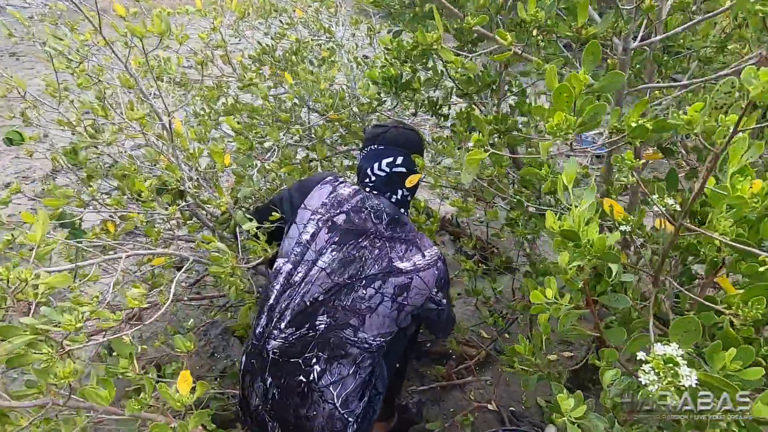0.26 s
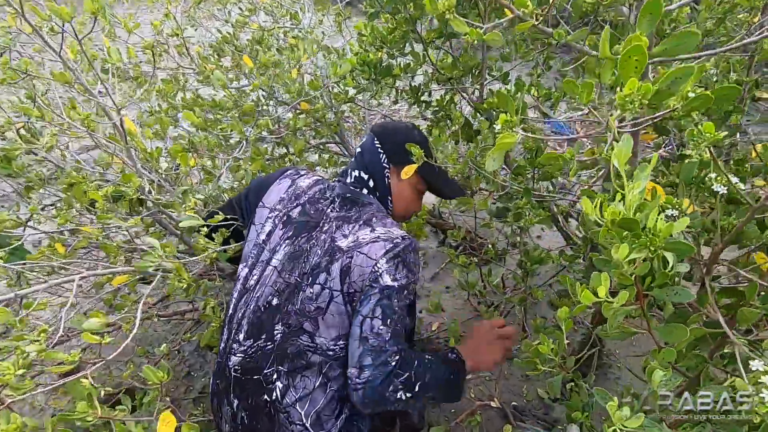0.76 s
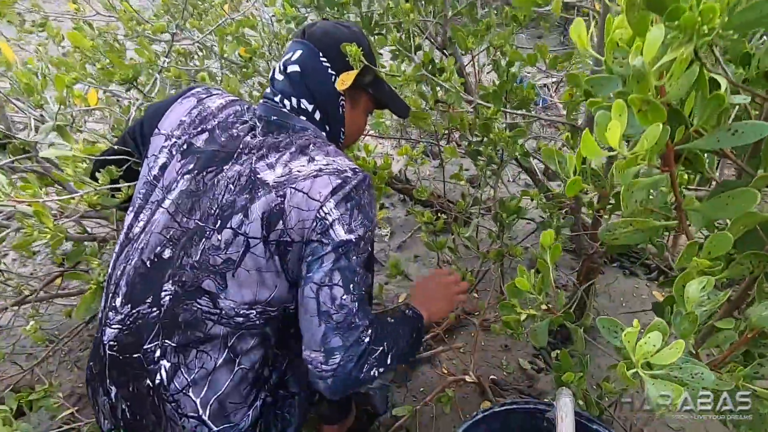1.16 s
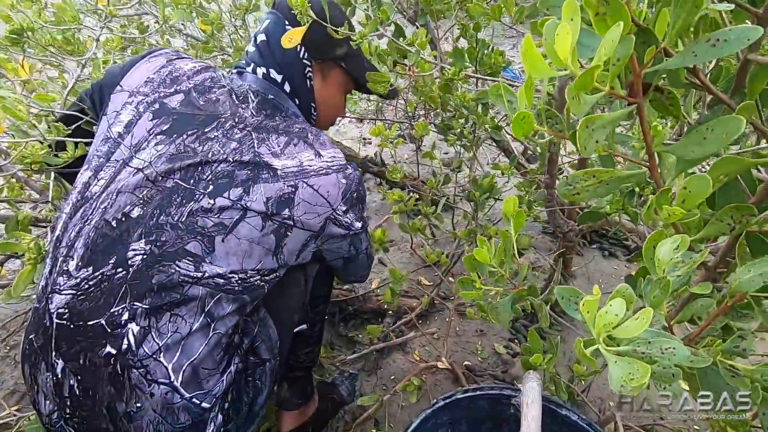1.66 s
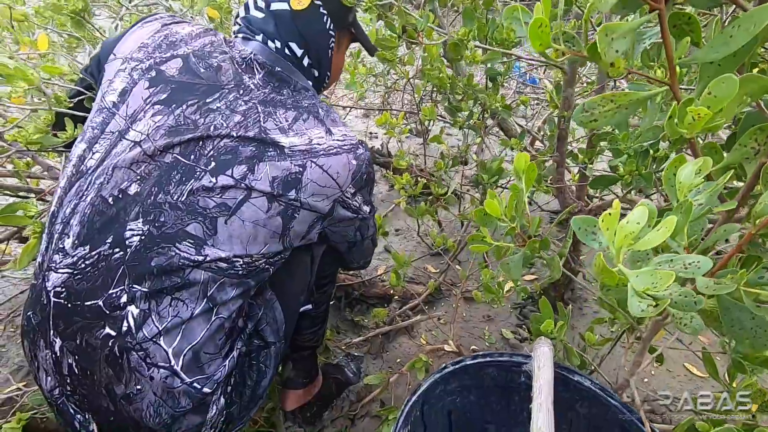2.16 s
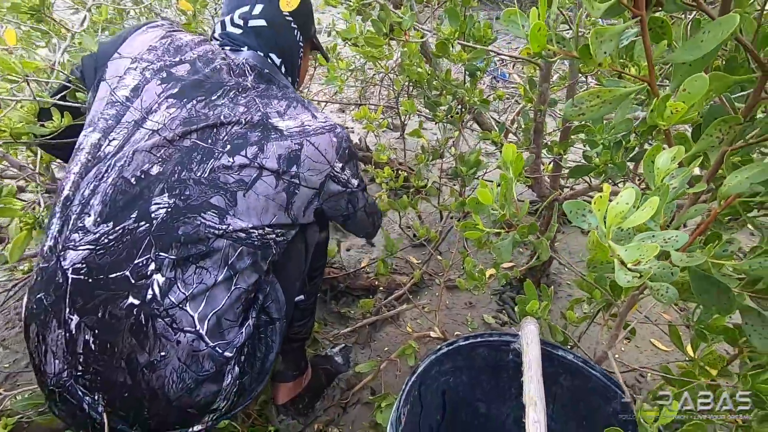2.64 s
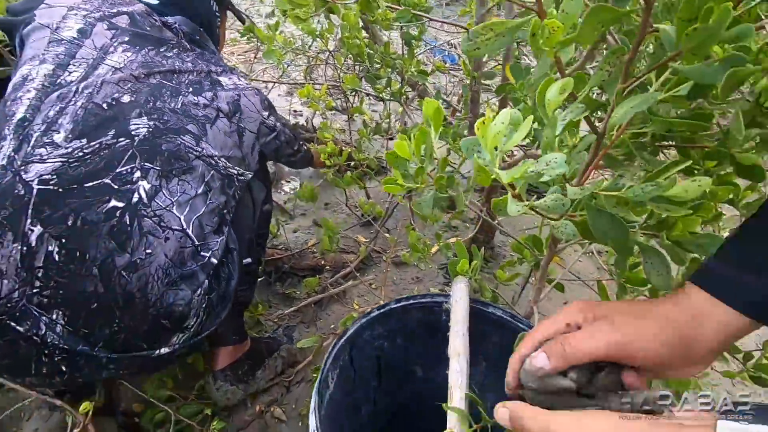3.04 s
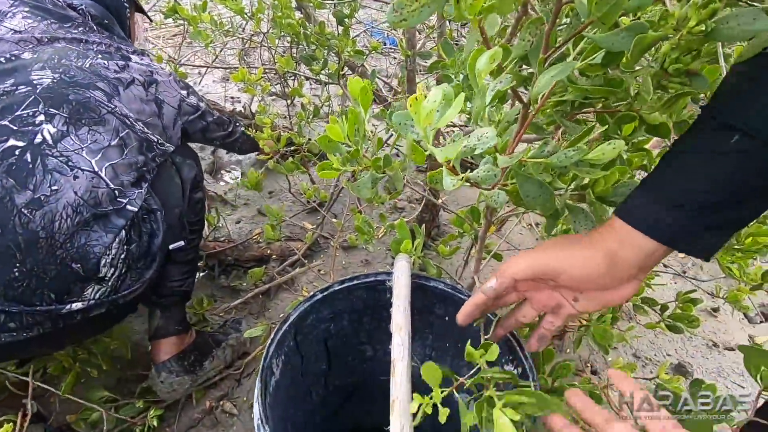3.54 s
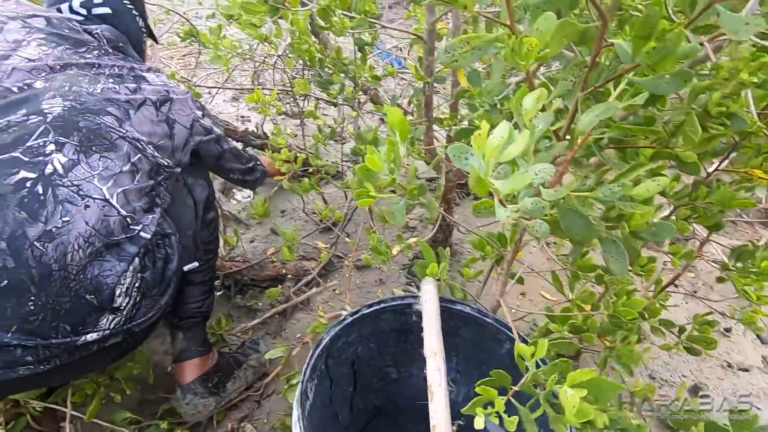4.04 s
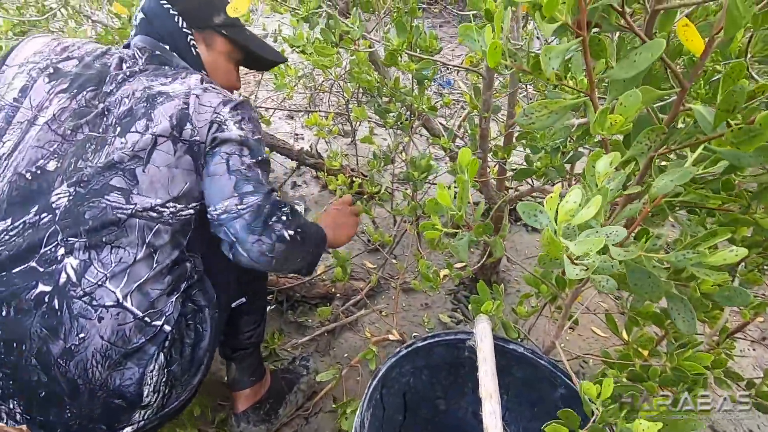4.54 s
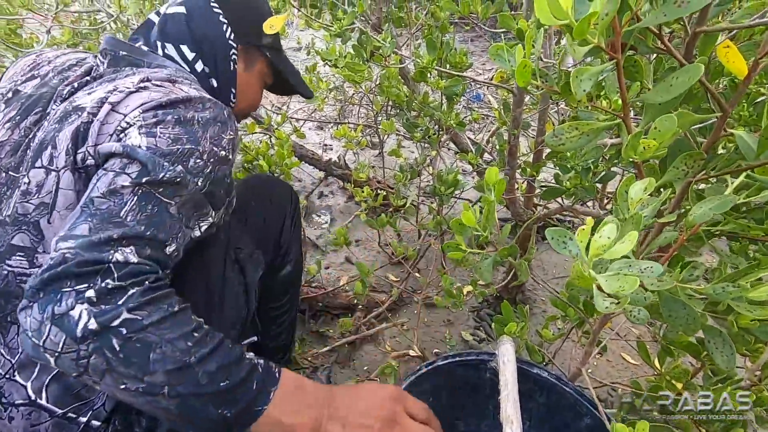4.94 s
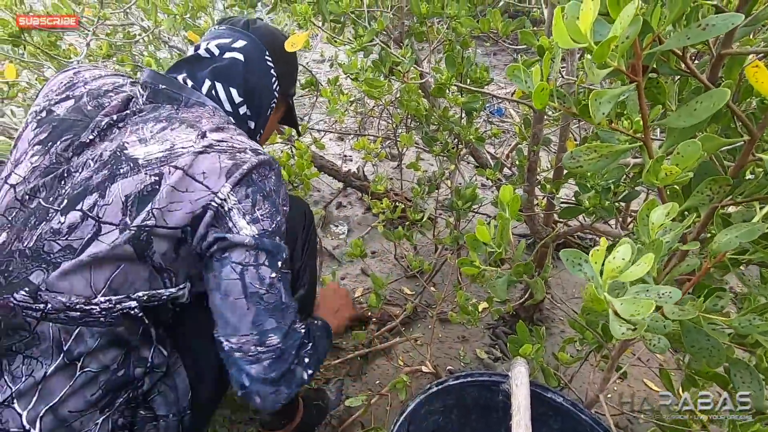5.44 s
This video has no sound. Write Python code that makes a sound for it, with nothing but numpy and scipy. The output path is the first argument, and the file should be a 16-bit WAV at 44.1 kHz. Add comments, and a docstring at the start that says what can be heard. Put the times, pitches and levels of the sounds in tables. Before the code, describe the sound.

Close foliage rustling, then hard shells knock and boom in a plastic bucket in three bursts, the middle one a longer pouring rattle.

```python
"""Leaves and sleeves rustle close by (clicks over hiss) and twigs snap (noise cracks) on a mangrove mudflat; then,
just under a stereo pair, gathered snails are tossed into a plastic bucket, singly and once by the handful, with a wash.
Each shell is a gritty noise burst that rings wall modes; the floor booms with a rising tone and bumps wobble the bucket.
Wet shells grind in a hand, sleeves whistle as wavering tones, feet shuffle as low noise.
Behind: open air and a low distant drone of filtered noise, and a thin bird chirp, one gliding sine."""
import sys
import numpy as np
from scipy import signal
from scipy.fft import rfft, irfft, next_fast_len
from scipy.io import wavfile
from scipy.ndimage import uniform_filter1d

SR = 44100
rng = np.random.default_rng(int(sys.argv[2]) if len(sys.argv) > 2 else 0)


def unload_audio(sound):
    """Save the sound as a 16-bit wav file, at the path given as the first command line argument."""
    columns = np.transpose(np.atleast_2d(sound))
    # keep every value between -1 and 1, then stretch to whole-number steps
    steps = np.round(np.clip(columns, -1, 1) * 32767)
    wavfile.write(sys.argv[1], SR, steps.astype(np.int16))


N = 251370
TIME = np.arange(N) / SR
HIT_SIZE = int(.24 * SR)   # longest single hit
HIT_TIME = np.arange(HIT_SIZE) / SR

# Every touch has a base level and a hardness; hardness mostly raises its high tick. All pans are left minus right.
# shells striking the bucket and each other: start_s, level_db, hardness_db, knock_hz, clack_hz
DROPS = [(1.217, -35.5, 9.5, 744, 1530), (1.231, -18.5, 14, 796, 1783), (1.236, -20.5, 8.5, 588, 1190),
         (1.244, -23, 1, 1060, 1770), (1.295, -23.5, -5, 570, 1610), (1.349, -26, -7, 960, 1540),
         (1.363, -17, -3.5, 945, 1290), (1.383, -25.5, -26, 595, 1260), (1.401, -24, -9, 980, 1130),
         (1.409, -19, -9, 1067, 1160), (1.532, -31, -24, 970, 1110), (3.436, -22.5, -4, 836, 3440),
         (3.442, -20, 9.5, 810, 3070), (3.448, -31, 15, 835, 1760), (3.472, -24, 12.5, 980, 1460),
         (3.498, -16.5, 0, 690, 1783), (3.507, -20, 8, 810, 1600), (3.524, -18.5, -5, 835, 1260),
         (3.553, -17.5, -5, 880, 1150), (3.569, -18.5, 6, 750, 1690), (3.599, -17.5, 3.5, 596, 1680),
         (3.617, -17.5, -1, 634, 1327), (3.626, -26, 8, 390, 1500), (3.655, -17.5, 2, 830, 1450),
         (3.678, -17, 2, 735, 1120), (3.692, -17, 0.5, 968, 1440), (3.738, -17, -6, 656, 1140),
         (3.756, -17.5, -14, 800, 1176), (3.778, -21, -28, 625, 1330), (3.868, -31.5, -25, 584, 1150),
         (3.891, -40, 13, 680, 1120), (3.914, -21, -2, 720, 1420), (3.95, -23, -16, 818, 1720),
         (4.216, -42.5, -9, 824, 1950), (4.288, -39.5, 5.5, 520, 1090), (5.158, -16.5, 3.5, 806, 1790),
         (5.193, -12.5, -3, 850, 1560), (5.215, -23, -26, 1000, 1140), (5.233, -17.5, 5.5, 1050, 1130),
         (5.284, -30.5, -10, 720, 1240), (5.327, -30.5, 6, 1020, 1070), (5.46, -25, 12, 1065, 1350),
         (5.476, -19.5, 8, 517, 1625), (5.494, -27, 14, 1074, 1650), (5.516, -33.5, 8.5, 1030, 1310)]
# shells landing on the drumming floor: start_s, level_db, pitch_hz (passed as it rises); a load lowers and damps it
LANDINGS = [(1.241, -14.5, 162), (1.267, -20.5, 198), (1.285, -12.5, 203.7), (1.334, -19, 216),
            (1.363, -4, 193.7), (1.382, -11, 199), (1.407, -12.5, 212.3), (1.513, -27, 207),
            (3.447, -8, 173), (3.478, -12, 192), (3.498, -8.5, 186), (3.517, -10.5, 195),
            (3.565, -6.5, 169), (3.587, -8.5, 176), (3.602, -5.5, 198.5), (3.625, -6, 207.5),
            (3.669, -9.5, 188), (3.742, -16, 211.8), (3.758, -12, 205), (3.92, -30, 204), (5.161, -25, 205),
            (5.188, -29, 211), (5.232, -9, 195), (5.474, -13, 210.5)]
# bumps that set the whole bucket wobbling: start_s, level_db (before the soft onset), t60_s
BUMPS = [(3.172, -18, 0.25), (3.207, -15.5, 0.19), (3.395, -30, 0.18), (3.565, -36, 0.17),
         (5.333, -18, 0.23), (5.359, -20, 0.34)]
# modes of the bucket wall: pitch_hz, level_db (relative), t60_s
WALL_MODES = [(420.7, -14, 0.2), (456, -12, 0.093), (608, -0.5, 0.063), (657, 1, 0.03), (774.3, 1.5, 0.16),
              (966, -3, 0.073), (1286, -5, 0.18), (1412, 0.5, 0.017), (1614, 0, 0.1), (1827, 9, 0.014),
              (2160, -1, 0.068), (2595, 1, 0.066), (3337, 0, 0.048), (4860, 6, 0.03)]
# a muddy handful of shells grinding and brushing the rim: start_s, level_db, hardness_db, knock_hz
HANDFUL = [(3.109, -27, -10, 946), (3.137, -26.5, 13.5, 1050), (3.164, -24, -1, 450),
           (3.17, -19, -15.5, 403), (3.223, -27.5, 8, 1000), (3.235, -25, 7, 1060), (3.245, -21.5, 9, 990),
           (3.257, -24, 3, 860), (3.273, -25, 16.5, 635), (3.304, -32, -8, 1010), (3.328, -32, 25, 955),
           (3.359, -26, 19, 980), (3.379, -37, -8, 1040), (3.421, -27.5, 7, 870)]
# twigs, leaves and wet mud snapping under the hands: start_s, level_db, hardness_db, clack_hz, pan_db
SNAPS = [(0.084, -29.5, -8.5, 1930, -3.5), (0.144, -17, -6.5, 3170, -3), (0.178, -32.5, -12, 1085, 1),
         (0.205, -24.5, -23, 1563, -14.5), (0.739, -37.5, 6, 3400, -10.5), (0.767, -29, -17, 1700, -5.5),
         (0.775, -26.5, -2, 3220, -5.5), (0.789, -37.5, 12.5, 1790, 3.5), (0.793, -33.5, 12.5, 2170, -5),
         (0.952, -30.5, -15, 1270, -3), (0.987, -22, -15, 1176, -2), (1.659, -40, 5.5, 1870, -1.5),
         (1.905, -37, 4, 3100, -2.5), (1.984, -24, -2.5, 3450, -6.5), (2.008, -25.5, 1, 2550, -3.5),
         (2.021, -35, 11, 2500, 2), (2.305, -32, -14, 1800, -3), (2.433, -40, 14.5, 1350, -2),
         (2.67, -36.5, 11, 3320, -2.5), (2.886, -30.5, -26, 1840, -1), (2.945, -36, 6.5, 2640, -1.5),
         (3.006, -42, 7, 1310, -1.5), (4.044, -34, -8.5, 1450, 0.5), (4.733, -39.5, 7, 1670, 0.5)]
# frequency ranges of knock, clack and tick: low_hz, high_hz, width (side over mid)
TOUCH_RANGES = [(324, 1180, 0.1), (1170, 3340, 0.072), (3970, 8370, 0.51)]
# knock, clack and tick of each kind of touch: above_level_db, slope (dB per dB of hardness)
DROP_COLOUR = [(0.5, 0.0343), (0.5, 0.4), (-14, 1.42)]
SNAP_COLOUR = [(-19.5, -0.3), (1.5, 0.0057), (-1.5, 1)]
SCRAPE_COLOUR = [(-2.5, -0.61), (1, -0.01), (-3.5, 0.64)]
# rustle of sleeves and leaves, with the wash of the pouring shells near 3.6 s, before their gains:
# start_s, swish_db, crackle_db
RUSTLE = [(0.0, -52.5, -47.5), (0.22, -36, -41), (0.35, -41.5, -37), (0.5, -46.5, -47), (1.0, -42, -45.5),
          (1.2, -46, -43), (1.31, -50, -56.5), (1.5, -49.5, -47.5), (1.95, -44.5, -44), (2.22, -52, -48.5),
          (2.38, -45, -41.5), (3.05, -42, -41.5), (3.28, -36.5, -34), (3.62, -29, -40), (4.0, -55, -55),
          (4.35, -54, -52), (4.82, -47, -50), (5.28, -52, -58.5), (5.7, -52, -58.5)]
# place of the rustle and wash: start_s, pan_db
RUSTLE_PAN = [(0.0, -7.5), (2.6, -7), (3.55, 1.5), (4.3, -9), (4.9, -2), (5.7, -3)]
# shifting feet and body: start_s, level_db
SHUFFLE = [(0.0, -48), (0.3, -40.5), (0.55, -50.5), (1.35, -45.5), (1.54, -58), (1.9, -49.5), (2.27, -58.5),
           (3.1, -46), (3.25, -33.5), (3.6, -53), (3.85, -79), (4.75, -68), (5.35, -35), (5.55, -67)]
# thin rubbing whistles of wet sleeves: start_s, length_s, start_hz, end_hz, level_db (mid-stroke)
RUBS = [(2.51, .14, 2080, 1740, -42), (2.705, 0.11, 1765, 1840, -37), (4.953, 0.15, 3100, 2600, -53),
        (5.551, .22, 2340, 4300, -48)]
# spectra of swish, leaf crackle, feet and open air: pitch_hz, level_db (relative, per Hz)
SWISH_SPECTRUM = [(200, -11), (450, -8), (900, -1.5), (1700, -0.5), (2700, -1), (4000, -8), (7000, -24),
                  (15000, -70)]
CRACKLE_SPECTRUM = [(1500, -7), (3000, -4), (4500, -2), (6000, -1.5), (8000, 0), (9500, -2), (11500, -5.5),
                    (14000, -13), (16000, -27)]
THUD_SPECTRUM = [(25, -20), (50, -11), (75, -1), (110, -8), (250, -9), (600, -24.5), (2000, -51)]
AIR_SPECTRUM = [(20, -42), (35, 0), (100, -10), (170, -1), (280, -7), (440, -15), (800, -16.5),
                (2500, -20.5), (5700, -21.5), (7800, -19.5), (9400, -47), (15000, -45)]
# bands of the distant drone: pitch_hz, width_hz, level_db (relative)
DRONE = [(150.9, 18.3, -1), (175.8, 23.7, -0.5), (214.7, 22.5, -8)]
# a bird's rising chirp: start_s, pitch_hz, level_db
CHIRP = [(5.36, 5570, -54), (5.385, 5800, -43), (5.405, 6200, -52), (5.42, 6500, -45), (5.44, 6600, -65),
         (5.455, 6560, -87)]

WALL_DB = -6   # ring of the wall against the crack that excites it
GRIT_DB = 4   # spread of the grains within one touch
# a shell bounces up to twice more, softer and duller each time
REBOUND_S, REBOUND_LOSS_DB, REBOUND_DULLING_DB = .011, 7, 10
# the handful pours in, then settles; the growing pile cushions each new shell
POUR_START_S, POUR_END_S, SETTLED_S = 3.48, 3.79, 3.89
POUR_PER_S, POUR_DB, POUR_SPREAD_DB, SETTLE_DB_PER_S = 62, -24.5, 3.5, 134
POUR_HARDNESS_DB, CUSHION_DB_PER_S = 7, 57
THROW_PAN_DB, POUR_PAN_DB = -4.5, -1.5   # single shells lean right, the handful sits nearer the centre
# unloaded floor; lowering its pitch by so many Hz halves its ring
FLOOR_FREE_HZ, FLOOR_FREE_T60_S, FLOOR_HZ_PER_HALVING = 211.4, 0.17, 22
WOBBLE_HZ = 83
SCRAPE_CLACK_HZ, SCRAPE_SPREAD_OCTAVES, SCRAPE_PAN_DB = 1326, 0.07, -1.5
# fainter snaps come at random, their level following the swish
SMALL_SNAPS_PER_S, SMALL_SNAP_OVER_SWISH_DB, SMALL_SNAP_SPREAD_DB, SMALL_SNAP_HZ = 5, 5.5, -1.5, 2215
SNAP_KNOCK_HZ = 883
# each listed snap leaves the foliage shaking for a moment
SHAKE_DB, SHAKE_T60_S = -4, 0.15
# harder touches tick higher
TICK_HZ, TICK_OCTAVES_PER_DB, TICK_SPREAD_OCTAVES = 4150, .05, .1
RUB_WAVER = .09   # unsteadiness of a rub's pitch (share)
AIR_DB, DRONE_DB = -51, -48
TREBLE_STOP_HZ = 16000


def shells_in_bucket(pan_spread_db=1.5):
    """Each shell cracks against the plastic and rings every wall mode, with chance signs and nearly even shares."""
    out = np.zeros((2, N))
    wall = np.array([from_db(db) * unit_hit(mode(hz, t60)) for hz, db, t60 in WALL_MODES])
    for s, *shell in shell_touches():
        colour = touch_colour(DROP_COLOUR, *shell)
        pouring = HANDFUL[-1][0] < s < SETTLED_S
        centre_db = POUR_PAN_DB if pouring else THROW_PAN_DB
        pan_db = centre_db + pan_spread_db * rng.standard_normal()
        crack = unit_hit(contact(crack_t60=.02, chatter_db=-1, chatter_t60=.045,
                                 tail_db=-32, tail_t60=.12, grit_db=GRIT_DB))
        shares = rng.uniform(0.97, 1, len(wall)) * rng.choice([-1, 1], len(wall))
        ringing = from_db(WALL_DB) * unit_hit(shares @ wall) * [[1], [0]]   # mid only
        shell_hit = voiced(crack + ringing, colour, ring_db=-3.0, cycles=160)
        add(out, s, shell_hit, pan_db, lag_per_db=0.95)
    return out


def shell_touches(knock_hz=740, clack_hz=1480, spread_octaves=0.234, hardness_spread_db=4, rest_db=-42, count=3):
    """Each drop and its bounces, then the patter of the pour; rows like DROPS."""
    touches = []
    for s, db, hardness, *pitches in DROPS:
        for k in range(count):
            bounce_db = db - k * REBOUND_LOSS_DB
            if k and bounce_db < rest_db:
                break
            # only the bounces vary in timing and pitch
            gap, *detune = 1 + min(k, 1) * rng.uniform(-0.1715, 0.167, 3)
            touches.append((s + k * REBOUND_S * gap, bounce_db, hardness - k * REBOUND_DULLING_DB,
                            *np.multiply(pitches, detune)))
    for s, size, edge, pitch in scattered(POUR_START_S, SETTLED_S, POUR_PER_S):
        db = POUR_DB + POUR_SPREAD_DB * size - SETTLE_DB_PER_S * max(s - POUR_END_S, 0)
        hardness = POUR_HARDNESS_DB - CUSHION_DB_PER_S * (s - POUR_START_S) + hardness_spread_db * edge
        shift = 2 ** (spread_octaves * pitch)
        touches.append((s, db, hardness, knock_hz * shift, clack_hz * shift))
    return touches


def bucket_floor(push_s=0.0043, sag=.12, sag_s=0.0075):
    """The floor gives way over a few milliseconds; its pitch rises as the weight of the shell lifts off."""
    out = np.zeros((2, N))
    for s, db, hz in LANDINGS:
        t60 = FLOOR_FREE_T60_S * 2 ** ((hz - FLOOR_FREE_HZ) / FLOOR_HZ_PER_HALVING)
        # passes the listed pitch at sag_s and ends slightly above it
        rising_hz = hz * (1 + sag * (np.exp(-1) - np.exp(-HIT_TIME / sag_s)))
        phase = 2 * np.pi * np.cumsum(rising_hz) / SR
        boom = np.sin(phase) * fade(t60) * (1 - np.exp(-(HIT_TIME / push_s) ** 2))
        add(out, s, from_db(db) * np.sqrt(2) * boom / np.abs(boom).max())
    # so small a surface radiates little deep bass
    return signal.sosfilt(signal.butter(2, 70, "high", fs=SR, output="sos"), out)


def bucket_bumps():
    """The thin bucket wobbles in its lowest mode, with a soft onset."""
    out = np.zeros((2, N))
    for s, db, t60 in BUMPS:
        add(out, s, from_db(db) * mode(WOBBLE_HZ, t60) * (1 - fade(0.042)))
    return out


def handful():
    """Wet shells slip over each other in brief gritty scrapes that ring in their hollows."""
    out = np.zeros((2, N))
    for s, db, hardness, knock_hz in HANDFUL:
        clack_hz = SCRAPE_CLACK_HZ * 2 ** (SCRAPE_SPREAD_OCTAVES * rng.standard_normal())
        colour = touch_colour(SCRAPE_COLOUR, db, hardness, knock_hz, clack_hz)
        touch = contact(crack_t60=0.08, chatter_db=-1, chatter_t60=0.07, tail_db=-6, tail_t60=0.15, grit_db=GRIT_DB)
        gripping = 1 - 0.38 * fade(0.0054)   # a scrape takes a moment to bite
        scrape = gripping * voiced(touch, colour, ring_db=3.5, cycles=140, tick_ring_db=-10, fizz_db=-7.5)
        add(out, s, scrape, SCRAPE_PAN_DB, lag_per_db=1.76)
    return out


def twig_snaps():
    """Short cracks with a crumbling tail."""
    out = np.zeros((2, N))
    for s, db, hardness, clack_hz, pan_db in SNAPS + small_snaps():
        colour = touch_colour(SNAP_COLOUR, db, hardness, SNAP_KNOCK_HZ, clack_hz)
        touch = contact(crack_t60=.012, chatter_db=-2, chatter_t60=.055, tail_db=-22, tail_t60=.14, grit_db=GRIT_DB)
        snap = voiced(touch, colour, ring_db=-1.5, cycles=74, tick_ring_db=0.5, fizz_db=-8.5)
        add(out, s, snap, pan_db, lag_per_db=4.0)
    return out


def small_snaps(hardness_db=-4, hardness_spread_db=6, spread_octaves=0.375, pan_db=-6.5):
    """Faint snaps whose level follows the swish, as rows like SNAPS."""
    times, swish_db, _ = np.transpose(RUSTLE)
    snaps = []
    for s, size, edge, pitch in scattered(0, N / SR, SMALL_SNAPS_PER_S):
        if s * SR >= N - HIT_SIZE / 2:
            continue   # too close to the end to be heard out
        db = np.interp(s, times, swish_db) + SMALL_SNAP_OVER_SWISH_DB + SMALL_SNAP_SPREAD_DB * size
        clack_hz = SMALL_SNAP_HZ * 2 ** (spread_octaves * pitch)
        snaps.append((s, db, hardness_db + hardness_spread_db * edge, clack_hz, pan_db))
    return snaps


def rustle_and_wash(swish_gain_db=2.0, crackle_gain_db=4.5):
    """Sleeves swish and leaves crackle; near 3.6 s the swish is the wash of the pouring shells."""
    swish_db, crackle_db = in_time(RUSTLE)
    brushing = fine_grains(per_s=440, spread_db=-2.0, clump_db=5.5, smooth_db=-5)
    leaves = fine_grains(per_s=600, spread_db=1.5, clump_db=12.5, smooth_db=-6)
    swish = from_db(swish_db + swish_gain_db) * coloured(brushing, SWISH_SPECTRUM)
    crackle_gain = np.hypot(from_db(crackle_db + crackle_gain_db), shaking())
    crackle = crackle_gain * coloured(leaves, CRACKLE_SPECTRUM)
    return (swish + crackle) * panned(in_time(RUSTLE_PAN)[0])


def fine_grains(per_s, spread_db, clump_db, smooth_db):
    """Clumps of tiny clicks, made of wide stereo noise, over a smooth brushing hiss."""
    born = rng.random(N) < per_s * from_db(clump_db * drift(25)) / SR
    clicks = born * from_db(spread_db * np.minimum(rng.exponential(1, N), 4))
    flutter = np.sqrt(signal.lfilter([1], [1, -.96], clicks ** 2 + 1e-12))   # each click dies away briefly
    return rms_one(flutter * noise(0.91)) + from_db(smooth_db) * noise(1.0)


def shaking():
    """Gain of the leaf crackle that dies away after each listed snap."""
    out = np.zeros((2, N))
    for s, db, hardness, _, _ in SNAPS:
        add(out, s, from_db(db + hardness + SHAKE_DB) * fade(SHAKE_T60_S))
    return out[0]


def sleeve_rubs(pan_db=-6):
    """The weave of the cloth buzzes unsteadily, swelling and gliding over each stroke of the arm."""
    out = np.zeros(N)
    for s, length, start_hz, end_hz, db in RUBS:
        along = np.clip((TIME - s) / length, 0, 1)
        hz = start_hz + (end_hz - start_hz) * along
        phase = 2 * np.pi * np.cumsum(hz * (1 + RUB_WAVER * drift(246))) / SR
        buzz = drift(100) * np.sin(phase) + drift(100) * np.cos(phase)
        out += from_db(db) * np.sin(np.pi * along) * buzz
    return out * panned(pan_db)


def shuffle():
    """Shifting feet and body thud softly: low noise that swells and falls."""
    return from_db(in_time(SHUFFLE)[0]) * coloured(noise(0.25), THUD_SPECTRUM)


def open_air():
    """The steady hush of the open mudflat: noise with a smooth spectrum."""
    return from_db(AIR_DB) * coloured(noise(0.47), AIR_SPECTRUM)


def distant_drone():
    """A far low hum: narrow bands of noise, nearly centred."""
    bands = [from_db(db) * rms_one(band(noise(0.19), hz - width / 2, hz + width / 2)) for hz, width, db in DRONE]
    return from_db(DRONE_DB) * rms_one(sum(bands))


def bird():
    """A small bird's thin chirp: one sine, gliding and slightly unsteady."""
    hz, db = in_time(CHIRP)
    sounding = (TIME > CHIRP[0][0]) & (TIME < CHIRP[-1][0])
    phase = 2 * np.pi * np.cumsum(hz * (1 + .022 * drift(300))) / SR
    return sounding * from_db(db) * np.sin(phase)


def touch_colour(rule, db, hardness, knock_hz, clack_hz):
    """Levels, then pitches, of knock, clack and tick."""
    levels = [db + above_db + slope * hardness for above_db, slope in rule]
    octaves = TICK_OCTAVES_PER_DB * np.clip(hardness, 0, 15) + TICK_SPREAD_OCTAVES * rng.standard_normal()
    return levels + [knock_hz, clack_hz, TICK_HZ * 2 ** octaves]


def contact(crack_t60, chatter_db, chatter_t60, tail_db, tail_t60, grit_db):
    """Mid and side of one touch: a crack, gritty chatter, then faint scatter from the bushes."""
    white, grit = rng.standard_normal((2, 2, HIT_SIZE))
    grains = rms_one(from_db(grit_db * rms_one(uniform_filter1d(grit[0], size=24))))
    chatter = from_db(chatter_db) * fade(chatter_t60) * grains
    tail = from_db(tail_db) * fade(tail_t60)
    return white * (fade(crack_t60) + chatter + tail)


def voiced(touch, colour, ring_db, cycles, tick_ring_db=-4, fizz_db=-23):
    """Knock, clack and tick of a touch: each a broad burst plus a short ring at the pitch of the touching piece."""
    out = 0
    for (low, high, width), db, hz, ring_share_db in zip(TOUCH_RANGES, colour[:3], colour[3:], (0, 0, tick_ring_db)):
        burst = unit_hit(band(touch, low, high, order=3))
        ring = unit_hit(mode(hz, min(cycles / hz, .05)))
        mid = unit_hit(burst[0] + from_db(ring_db + ring_share_db) * ring)
        out = out + from_db(db) * (mid + width * burst[1] * [[1], [-1]]) / np.hypot(1, width)
    # sand in the contact fizzes at the top of the tick and above
    fizz = unit_hit(band(touch, TOUCH_RANGES[-1][1], 9700, order=1))
    return out + from_db(colour[2] + fizz_db) * fizz


def scattered(start, end, per_s):
    """Uneven times at a given mean rate, each with three chance values."""
    slots = np.arange(start, end, 1 / per_s)
    chance = rng.standard_normal((256, 4))[:len(slots)]
    return zip(slots + np.abs(chance[:, 0]) / per_s, *chance[:, 1:].T)


def add(out, s, sound, pan_db=0, lag_per_db=0):
    """Place a sound in time; it reaches the farther microphone some samples later."""
    for side, sign in enumerate((-1, 1)):
        start = int(s * SR + max(sign * pan_db, 0) * lag_per_db)
        piece = (sound * panned(pan_db))[side, :N - start]
        out[side, start:start + len(piece)] += piece


def panned(pan_db):
    """Left and right gains of constant power."""
    gains = from_db(np.array([np.atleast_1d(pan_db), -np.atleast_1d(pan_db)]) / 2)
    return gains / np.sqrt(np.mean(gains ** 2, axis=0))


def mode(hz, t60):
    """A struck mode: a decaying sine."""
    return np.sin(2 * np.pi * hz * HIT_TIME) * fade(t60)


def fade(t60):
    """Exponential decay over the length of a hit; t60 in seconds."""
    return np.exp(-np.log(1000) * HIT_TIME / max(t60, 1e-3))


def noise(width):
    """White stereo noise; width is side over mid."""
    mid, side = rng.standard_normal((2, N))
    return np.array([mid + width * side, mid - width * side])


def coloured(source, spectrum):
    """Give a source a smooth spectrum; rms 1."""
    hz, db = np.transpose(spectrum)
    size = next_fast_len(N)
    bins = np.maximum(np.fft.rfftfreq(size, 1 / SR), 1)
    gain = from_db(np.interp(np.log(bins), np.log(hz), db)) * np.minimum(bins / hz[0], 1)
    return rms_one(irfft(rfft(source, size) * gain, size)[:, :N])


def band(x, low, high, order=2):
    """Causal band-pass."""
    return signal.sosfilt(signal.butter(order, [low, min(high, .45 * SR)], "band", fs=SR, output="sos"), x)


def drift(rate):
    """Smooth chance wandering with spread 1; rate in Hz."""
    r = np.exp(-80 * np.pi * rate / SR)   # one value every 40 samples
    slow = signal.lfilter([1], [1, -2 * r, r * r], rng.standard_normal(N // 40 + 2002))[2000:]
    return np.interp(np.arange(N) / 40, np.arange(len(slow)), rms_one(slow))


def in_time(rows):
    """Curve rows to one value a sample for each column."""
    s, *columns = np.transpose(rows)
    return [np.interp(TIME, s, c) for c in columns]


def from_db(db):
    """Decibels to gain."""
    return 10 ** (np.asarray(db) / 20)


def rms_one(x):
    """Scale to unit power."""
    return x / np.sqrt(np.mean(x ** 2) + 1e-20)


def unit_hit(x):
    """Scale a hit to the energy of a hundredth of a second at unit power."""
    return x / np.sqrt(np.sum(x ** 2, axis=-1, keepdims=True) * 100 / SR + 1e-20)


def scene():
    """Everything heard from just above the bucket."""
    bucket = shells_in_bucket() + bucket_floor() + bucket_bumps()
    around_bucket = handful() + twig_snaps() + rustle_and_wash() + sleeve_rubs() + shuffle()
    background = open_air() + distant_drone() + bird()
    return bucket + around_bucket + background


def record(dry, shelf_hz=10000, shelf_db=-7):
    """The microphone thins the deep bass and the top treble; peaks are rounded and the top is cut."""
    thinned = signal.sosfilt(signal.butter(1, 28, "high", fs=SR, output="sos"), dry)
    low = signal.sosfiltfilt(signal.butter(8, min(shelf_hz, .45 * SR), fs=SR, output="sos"), thinned)
    heard = low + from_db(shelf_db) * (thinned - low)
    rounded = heard / (1 + heard ** 4) ** .25
    return signal.sosfilt(signal.cheby2(14, 60, TREBLE_STOP_HZ, fs=SR, output="sos"), rounded)


dry = scene()
out = record(dry)
unload_audio(out)
```